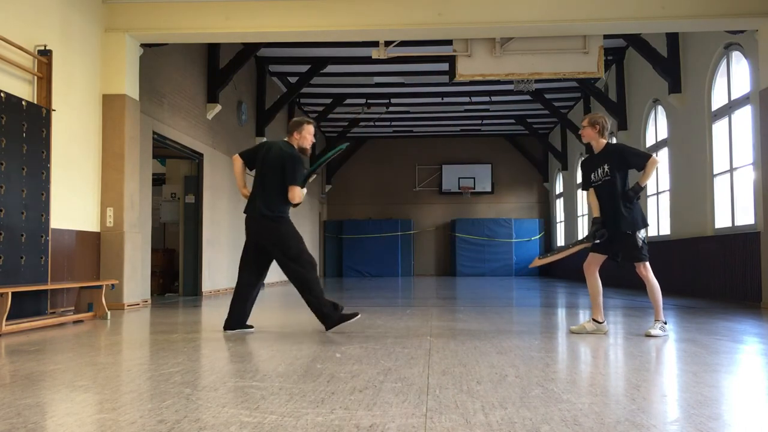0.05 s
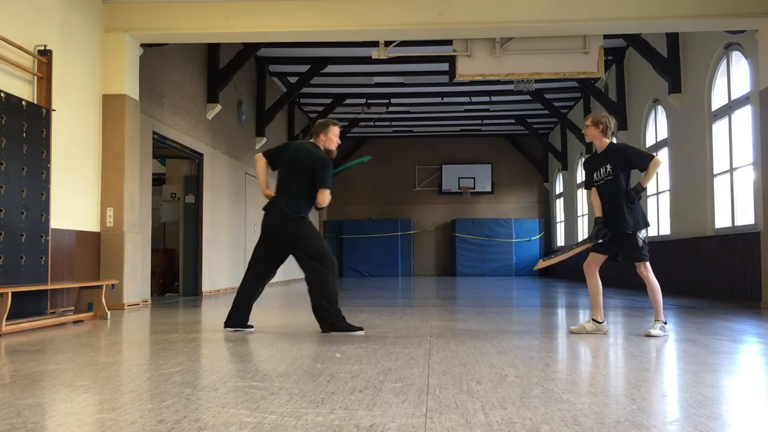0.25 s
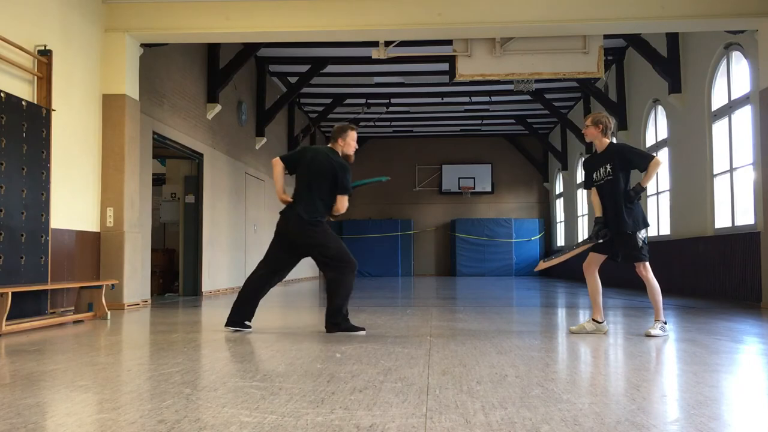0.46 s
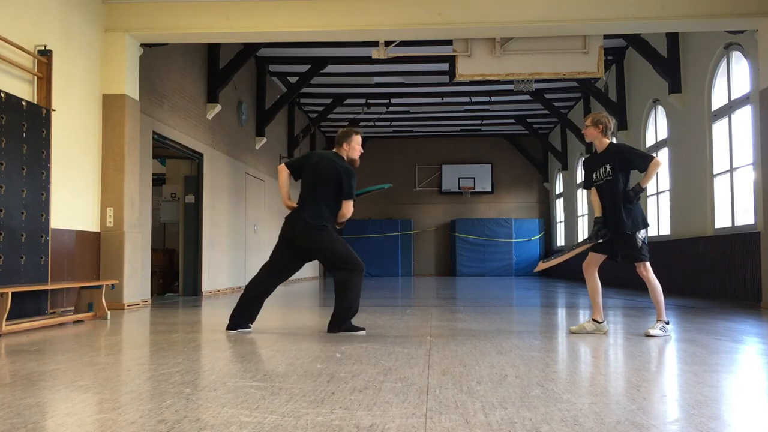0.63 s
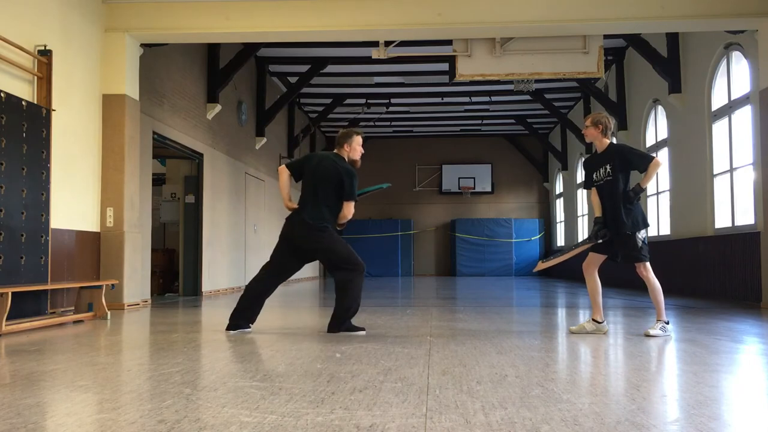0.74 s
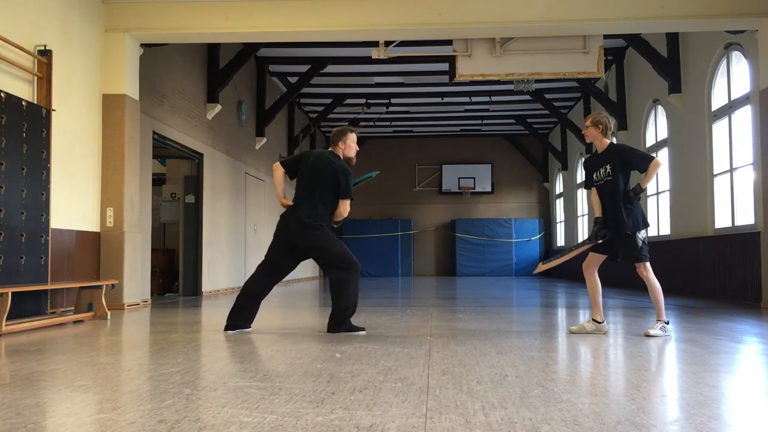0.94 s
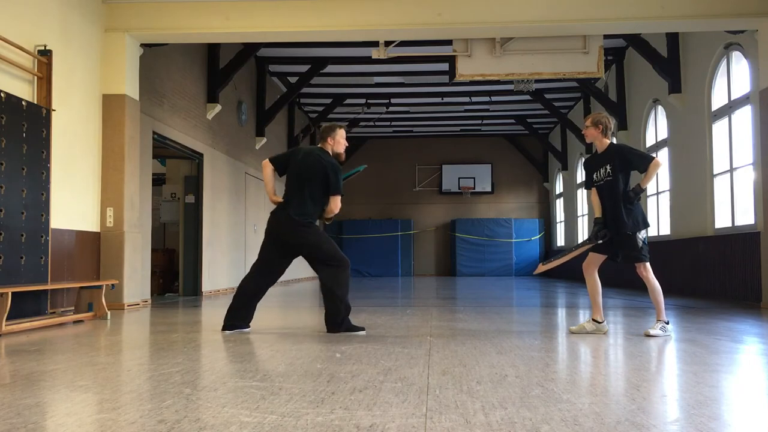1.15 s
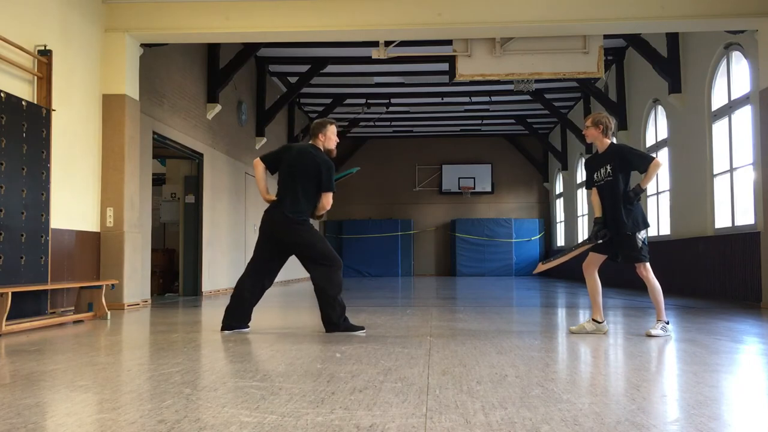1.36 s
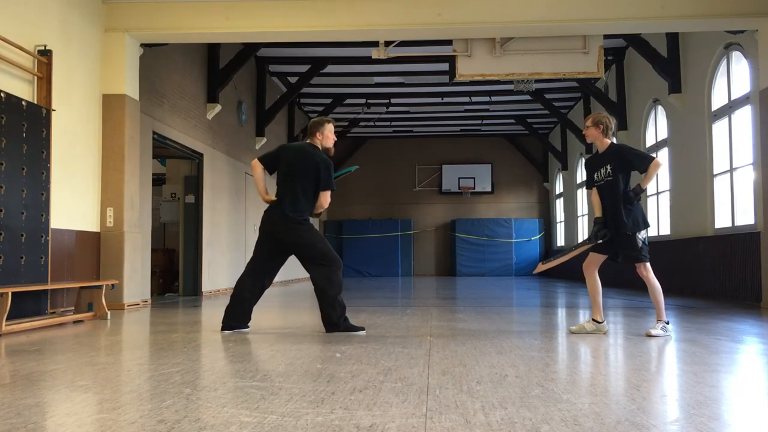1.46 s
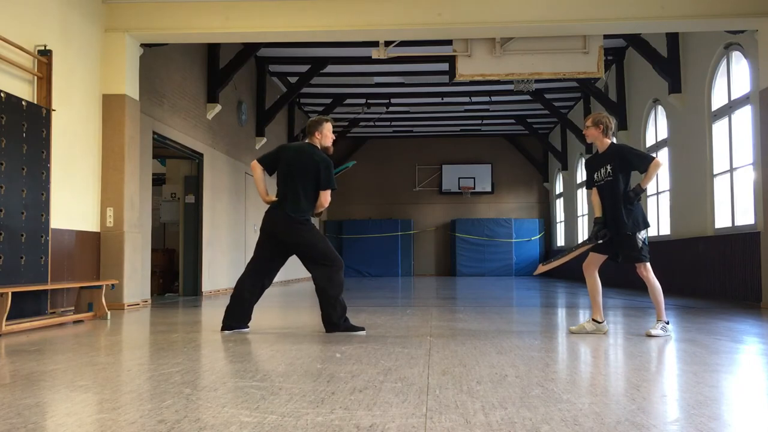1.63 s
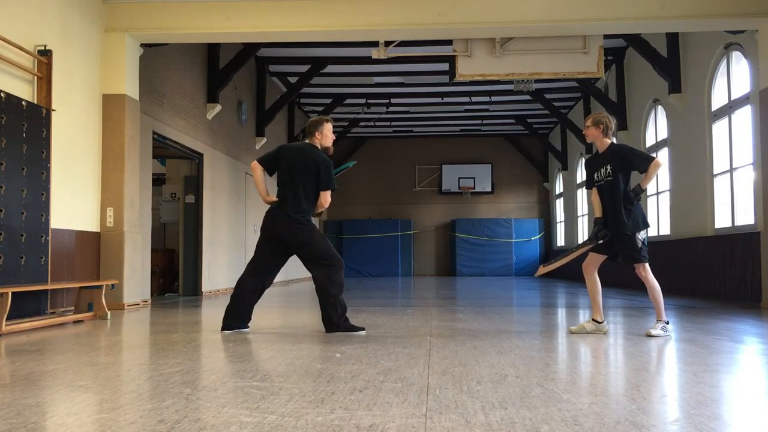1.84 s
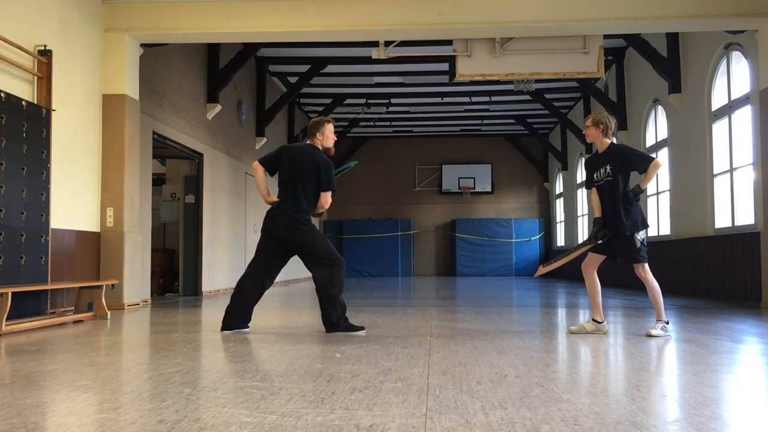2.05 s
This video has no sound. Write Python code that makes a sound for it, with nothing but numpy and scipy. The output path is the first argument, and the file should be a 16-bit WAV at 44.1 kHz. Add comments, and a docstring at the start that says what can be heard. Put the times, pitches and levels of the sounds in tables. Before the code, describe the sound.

One foot lands with a low, muffled boom on the boards of a quiet gym.

```python
"""A large, quiet gym hall, where a fencer lunges on the sprung wooden floor.
Heel, sole and body weight come down softly one after another and the floor booms in its low modes.
The sole pats, loose clothing swishes and the boards rumble under shifting weight.
The hall answers the booms over a faint, steady room noise."""
import sys
import numpy as np
from scipy import signal
from scipy.fft import rfft, irfft
from scipy.io import wavfile

SR = 44100
rng = np.random.default_rng(int(sys.argv[2]) if len(sys.argv) > 2 else 0)


def generate_wav(sig):
    """Save sig (samples, or channels by samples) to the path in sys.argv[1] as 16-bit PCM at SR."""
    pcm = np.round(np.clip(np.atleast_2d(sig).T, -1, 1) * 32767).astype(np.int16)
    wavfile.write(sys.argv[1], SR, pcm)


N = 92610
T = np.arange(N) / SR


def from_db(db):
    """Decibels to gain."""
    return 10 ** (np.asarray(db) / 20)


def rms_one(x):
    """Scale to rms 1."""
    return x / np.sqrt(np.mean(x ** 2) + 1e-20)


def noise(colour):
    """Noise of rms 1, shaped by an EQ curve of (freq_hz, gain_db) points."""
    hz, db = np.transpose(colour)
    bin_hz = np.maximum(np.arange(N // 2 + 1) * SR / N, 1)
    eq = from_db(np.interp(np.log(bin_hz), np.log(hz), db))
    return rms_one(irfft(rfft(rng.standard_normal(N)) * eq, N))


def drift(rate_hz):
    """A random wobble of rms 1 that glides to a new value rate_hz times a second."""
    return rms_one(np.interp(T * rate_hz, np.arange(N), rng.standard_normal(N)))


def swells(rows):
    """Envelope of movements that fade in on a bell curve and die away, summed in power."""
    power = np.zeros(N)
    for peak_s, level_db, rise_s, fall_s in rows:
        fade = np.where(T < peak_s, .5 * ((T - peak_s) / rise_s) ** 2, (T - peak_s) / fall_s)
        power += (from_db(level_db) * np.exp(-fade)) ** 2
    return np.sqrt(power)


# the tone of the hall's air: freq_hz, gain_db
AIR_EQ = [(20, -36.5), (32, -25), (45, -2), (64, -3.5), (112, -1), (140, -8.5), (200, -7.5), (320, -10.5),
          (400, -15), (460, -19.5), (666, -21.5), (905, -26), (1450, -27.5), (4400, -36), (7500, -41),
          (8600, -38), (12000, -41), (15500, -47)]

def room_tone(air_db=-62.5, hum_db=-76.5, hum_hz=299.4, waver_hz=6.13, fade_db_per_s=-1.5):
    """A bed of air with a faint wavering hum, easing down; the levels hold at mid-scene."""
    phase = 2 * np.pi * hum_hz * T
    hum = rms_one(drift(waver_hz) * np.sin(phase) + drift(waver_hz) * np.cos(phase))
    bed = from_db(air_db) * noise(AIR_EQ) + from_db(hum_db) * hum
    return bed * from_db(fade_db_per_s * (T - T.mean()))


# the base tone of sliding cloth: freq_hz, gain_db
RUSTLE_EQ = [(300, 4.5), (1000, -3), (2400, -2), (3500, -8.5), (5000, -5.5), (7200, -16), (9000, -14),
             (11800, -9.5), (15500, -19)]
# rustles as the body sinks and straightens: peak_s, level_db, rise_s, fall_s, centre_hz
BODY_RUSTLES = [(0.399, -71.5, 0.065, 0.13, 2830), (0.484, -72.5, 0.041, 0.022, 2800),
                (.55, -76.5, 0.04, .1, 1495), (.625, -75.5, 0.045, 0.11, 1900),
                (1.17, -80, 0.056, .12, 1890), (1.37, -78, 0.1, 0.21, 2950)]

def rustles(boost_db=4.5, width_octaves=0.39):
    """Cloth noise with a broad EQ bump at each move's own centre pitch; some brighter, some duller."""
    hz, db = np.transpose(RUSTLE_EQ)
    grid_hz = np.geomspace(hz[0], hz[-1], 80)
    base_db = np.interp(np.log(grid_hz), np.log(hz), db)
    cloth = np.zeros(N)
    for *swell, centre_hz in BODY_RUSTLES:
        bump_db = boost_db * np.exp(-.5 * (np.log2(grid_hz / centre_hz) / width_octaves) ** 2)
        cloth += swells([swell]) * noise(np.column_stack([grid_hz, base_db + bump_db]))
    return cloth


# the swish of the swinging trouser leg: peak_s, level_db, rise_s, fall_s
LEG_SWISHES = [(.27, -75.5, 0.12, 0.2)]
# its airy tone: freq_hz, gain_db
SWISH_EQ = [(800, -4.5), (1400, 0.5), (3000, -10.5), (3900, -8.5), (4500, 1.5), (5400, -6.5), (7000, -15.5),
            (9500, -20), (12000, -12), (15500, -11)]
# folds snapping taut: peak_s, level_db, rise_s, fall_s
FOLD_FLICKS = [(.337, -79, .003, 0.0091), (.399, -74, .004, 0.0099), (2.059, -77, 0.0037, 0.013)]
# their crisp tone: freq_hz, gain_db
FLICK_EQ = [(600, 1), (1800, 0), (3000, 0), (4500, -3), (7000, -4), (12000, -12), (15500, -10)]

def clothing(grain_db=1.53, grains_per_s=170):
    """Fabric slides on fabric with a fine grain, and folds flick taut."""
    sliding = swells(LEG_SWISHES) * noise(SWISH_EQ) + rustles()
    grain = from_db(grain_db * drift(grains_per_s))
    flicks = swells(FOLD_FLICKS) * noise(FLICK_EQ)
    return sliding * grain + flicks


# the sole meeting the boards: start_s, level_db
SOLE_PATS = [(0.262, -63.5), (.435, -74), (0.548, -77), (1.735, -76), (2.053, -76)]
# the dull tone of a pat: freq_hz, gain_db
PAT_EQ = [(120, -3.5), (280, 0), (450, 0), (640, -7), (820, -3), (980, -15.5), (2500, -23), (8000, -45)]

def sole_pats(attack_s=0.0065, t60_s=0.33, tail_db=-6, tail_t60_s=1.5):
    """The sole lands in short, dull pats, each with a reverberant tail."""
    power = np.zeros(N)
    for start_s, level_db in SOLE_PATS:
        age = np.maximum(T - start_s, 0)
        attack = 1 - np.exp(-age / attack_s)
        decay = from_db(-60 * age / t60_s) + from_db(tail_db - 60 * age / tail_t60_s)
        power += (from_db(level_db) * attack * decay) ** 2
    return np.sqrt(power) * noise(PAT_EQ)


# weight shifts after the landing: peak_s, level_db, rise_s, fall_s
WEIGHT_SHIFTS = [(.90, -60.5, 0.047, 0.16), (1.35, -64, 0.013, 0.042), (1.68, -65, 0.022, 0.027),
                 (1.87, -57.5, 0.019, 0.046)]
# their sub-heavy tone: freq_hz, gain_db
RUMBLE_EQ = [(25, -38), (45, -4), (64, 10), (95, -10), (180, -34), (500, -69)]

def floor_rumble():
    """The floor rumbles in low swells under shifting weight."""
    return swells(WEIGHT_SHIFTS) * noise(RUMBLE_EQ)


def hall_reverb(boom, wet_db=-20.5, t60_s=1.3, bloom_s=0.091):
    """The hall's dark tail: dense low reflections that bloom and die slowly."""
    dark_noise = noise([(20, 0.5), (70, 13), (200, 15.5), (400, -45), (2000, -80)])
    reflections = dark_noise * from_db(-60 * T / t60_s) * (1 - np.exp(-T / bloom_s))
    wet = signal.fftconvolve(boom, reflections)[:N]
    return from_db(wet_db) * np.std(boom) * rms_one(wet)


# the resonances of the sprung floor: pitch_ratio, gain_db
BOOM_MODES = [(0.758, -18.5), (0.998, 0.5), (1.42, -15), (1.981, -20)]
# thuds of weight shift, heel, sole, body and rebound; a harder load rings the top two modes more:
# start_s, level_db, pitch_hz, rise_s, upper_modes_db
LUNGE_THUDS = [(.055, -52.5, 66, 0.033, 1), (.103, -52, 62, 0.023, -7), (.183, -37, 83, 0.027, -4.5),
               (.2095, -30, 64.5, 0.034, -2.5), (0.2688, -30, 65.4, 0.046, 4),
               (0.3474, -37, 69.4, 0.027, -4.5), (.413, -41, 64.7, 0.023, -2.5),
               (0.4686, -41, 54.6, 0.024, 0.5), (.515, -46, 57.7, 0.035, -7), (0.579, -45, 53.5, 0.03, -5),
               (0.733, -50.5, 54.7, 0.038, 2.5)]

def floor_boom(build_up_power=4.0):
    """Each soft load builds up a few cycles of the floor's low modes, which die as the legs damp them."""
    boom = np.zeros(N)
    for start_s, level_db, pitch_hz, rise_s, upper_modes_db in LUNGE_THUDS:
        age = np.maximum(T - start_s, 0)
        envelope = (age / rise_s * np.exp(1 - age / rise_s)) ** build_up_power
        for mode, (pitch_ratio, gain_db) in enumerate(BOOM_MODES):
            gain = from_db(level_db + gain_db + upper_modes_db * (mode > 1))
            boom += gain * envelope * np.sin(2 * np.pi * pitch_hz * pitch_ratio * age)
    return boom


def scene():
    """The mono mix: the boom and its reverb up front, foley and room tone beneath."""
    boom = floor_boom()
    mix = boom + hall_reverb(boom) + sole_pats() + clothing() + floor_rumble() + room_tone()
    return mix[None]


def record(dry, cutoff_hz=15600):
    """A steep high cut on the whole mix."""
    high_cut = signal.ellip(10, .1, 70, cutoff_hz, fs=SR, output="sos")
    return signal.sosfilt(high_cut, dry)


dry = scene()
out = record(dry)
generate_wav(out)
```